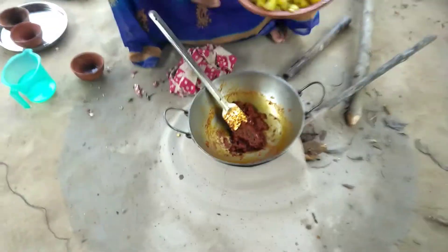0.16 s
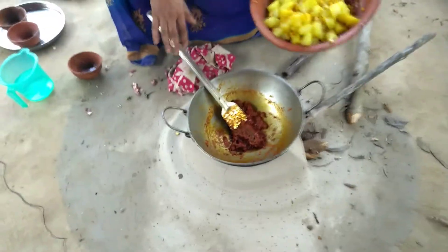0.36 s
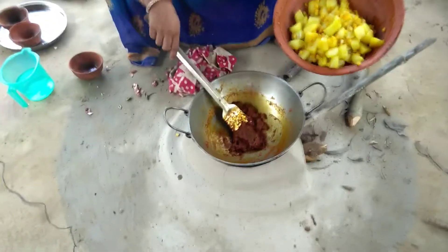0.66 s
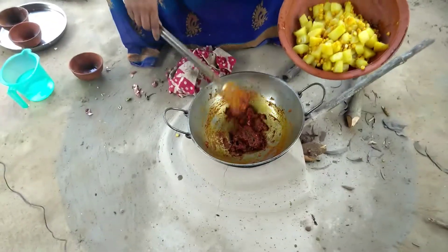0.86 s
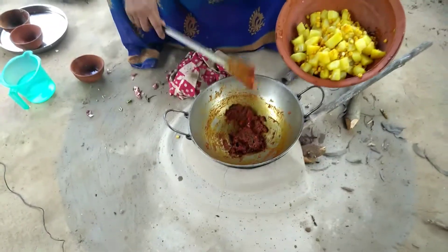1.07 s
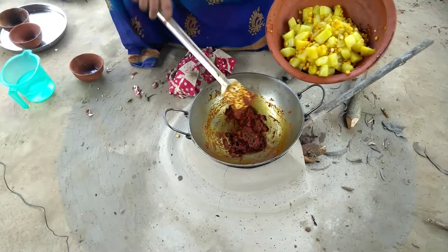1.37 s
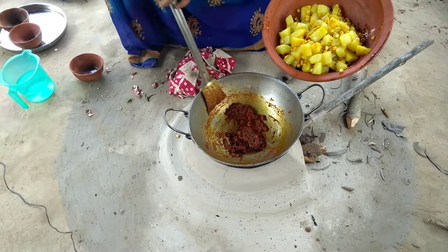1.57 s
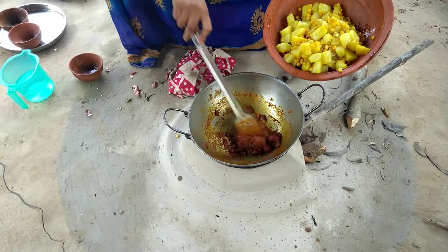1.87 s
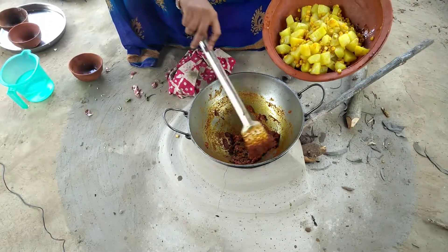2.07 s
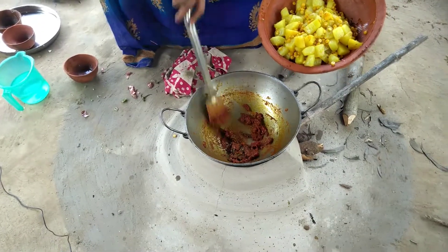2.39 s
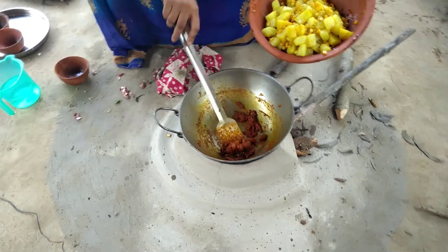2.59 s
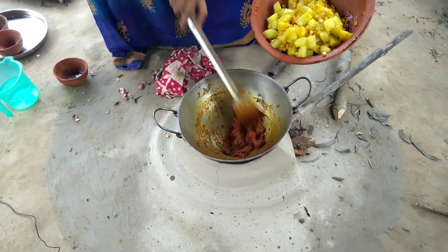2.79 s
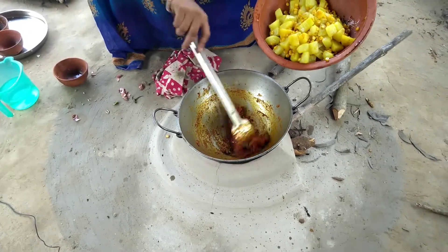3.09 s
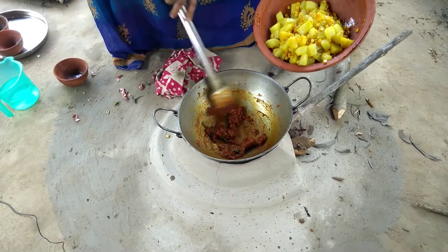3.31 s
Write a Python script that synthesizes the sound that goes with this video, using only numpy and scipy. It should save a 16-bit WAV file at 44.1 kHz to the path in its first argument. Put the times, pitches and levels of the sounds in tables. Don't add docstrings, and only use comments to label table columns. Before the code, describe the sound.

Spice paste sizzling in a metal pan, thin spitting flaring into dense frying after a spatula knock

```python
import sys
import numpy as np
from scipy import signal
from scipy.io import wavfile
from scipy.ndimage import uniform_filter1d

SR = 44100
rng = np.random.default_rng(int(sys.argv[2]) if len(sys.argv) > 2 else 0)


def volts(x):
    e = np.asarray(x, float) / 20
    return 10 ** e


def output_pcm(signal):
    pcm = np.clip(np.atleast_2d(signal).T, -1, 1) * 32767
    wavfile.write(sys.argv[1], SR, np.round(pcm).astype(np.int16))


N = 152145
T = np.arange(N) / SR
APART = np.array([[1], [-1]])


def unit(x):
    return x / np.sqrt(np.mean(x ** 2) + 1e-30)


def band(x, hz, octaves):
    half = 2 ** (octaves / 2)
    edges = np.clip([hz / half, hz * half], 10, SR / 2.05)
    return signal.sosfilt(signal.butter(2, edges, "band", fs=SR, output="sos"), x)


def walk(rate):
    hold = int(SR / rate)
    steps = np.repeat(rng.standard_normal(N // hold + 1), hold)
    smooth = uniform_filter1d(uniform_filter1d(steps, hold), hold)
    return unit(smooth[:N])


def clicks(rate, spread_db, shape):
    chance, sign, size = rng.random((3,) + shape)
    return (chance < rate / SR) * np.sign(sign - .5) * volts(-spread_db * np.log(size + 1e-4))


def ring(x, modes):
    out = 0
    for hz, db, t60 in modes:
        decay = np.exp(-np.log(1000) / (min(t60, 1.5) * SR))
        turn = 2 * np.pi * hz / SR
        poles = [1, -2 * decay * np.cos(turn), decay * decay]
        out = out + volts(db) * signal.lfilter([0, np.sin(turn)], poles, x)
    return out


def left_right(db):
    return np.array([volts(db / 2), volts(-db / 2)])


def bands(tone, make, lo_hz, flicker_db, rate, pan_db=0):
    tone, out, shared = np.array(tone), 0, walk(rate / 2)
    for hz in lo_hz * 2 ** np.arange(0, np.log2(17000 / lo_hz), 1 / 3):
        x = make()
        side = 1 / np.sqrt(1 + (4170 / hz) ** 2)
        stereo = np.array([x[0] + side * x[1], x[0] - side * x[1]])
        layer = unit(band(stereo, hz, 1 / 3))
        db = np.interp(np.log(hz), np.log(tone[:, 0]), tone[:, 1]) + 10 * np.log10(hz)
        flicker = flicker_db * (walk(rate) + .5 * shared)
        out = out + volts(db + flicker) * layer * left_right(pan_db * side ** 4).reshape(2, -1)
    return unit(out)


def sizzle(level_db, pan_db, tone, grain, lo_hz, start_s, stop_s):
    rate, spread_db, hiss_db, pop_rate, pop_db = grain
    broad = volts(pop_db) * unit(clicks(pop_rate, spread_db, (2, N)))

    def make():
        bursts = unit(clicks(rate, spread_db, (2, N)))
        return bursts + volts(hiss_db) * rng.standard_normal((2, N)) + broad

    fade_in = np.clip((T - start_s) / 0.011, 0, 1)
    fade_out = np.clip((stop_s - T) / 0.1, 0, 1)
    return bands(tone, make, lo_hz, 0.7, 34.98, pan_db) * fade_in * fade_out * volts(level_db)


def friction(rows, modes, t60, rate, ring_db, octaves):
    slip = unit(clicks(rate, 2.0, (2, N))) + .5 * rng.standard_normal((2, N))
    slip = slip * volts(2.0 * walk(39.95))
    ringing = unit(ring(slip, [(hz, db, t60) for hz, db in modes]))
    body = unit(slip) + volts(ring_db) * ringing
    out = 0
    for start, rise, fall, db, hz in rows:
        t = T - start
        swell = np.clip(t / max(rise, .001), 0, 1) ** 0.71
        fade = volts(-20 * np.clip((t - rise) / fall, 0, 9) ** 1.59)
        color = unit(band(band(body, hz, octaves), hz, 2 * octaves))
        out = out + volts(db) * swell * fade * color
    return out


def strikes(rows, modes, crack_db, spread_db, rattle_s, pan_db=0):
    out, n = np.zeros((2, N)), SR
    t = np.arange(n) / SR
    for start, db in rows:
        push = rng.standard_normal((2, n)) * np.exp(-np.minimum(t / rattle_s, 20))
        push[1] = 0.23 * push[0] + 2.3 * push[1]
        push = push / np.sqrt(np.sum(push ** 2, axis=1, keepdims=True))
        tilt = spread_db * rng.standard_normal(len(modes))
        x = ring(push, [(hz, d + shift, t60) for (hz, d, t60), shift in zip(modes, tilt)])
        crack = volts(crack_db) * band(push, 7400, 2.3) / np.abs(push).max()
        blow = volts(db) * left_right(pan_db)[:, None] * (x / np.abs(x).max() + crack)
        i = int(start * SR)
        out[:, i:i + n] += blow[:, :N - i]
    return out


def yard_air():
    # pitch_hz, level_db (per Hz)
    air_tone = [(30, -20), (70, -7), (250, -16), (750, -8), (1800, -16), (16000, -34)]
    return volts(-71) * bands(air_tone, lambda: rng.standard_normal((2, N)), 27.05, 0.94, 6.4)


def blade_rasps():
    # start_s, rise_s, fall_s, level_db, center_hz
    rasp_rows = [(0, 0.0045, 0.053, -45, 3470), (.092, 0.0013, 0.11, -53.5, 2160),
                 (.23, 0.0031, 1.2, -56.5, 1990), (.48, 0.16, 0.14, -50, 2060),
                 (.59, 0.014, 0.063, -35.5, 7350), (.685, 0.0035, 0.035, -57, 2600),
                 (.92, 0.01, 0.14, -44.5, 2600), (1.62, 0.0023, 0.3, -37.5, 5870),
                 (1.64, 0.018, 0.15, -43.5, 1450), (2.06, 0.0055, 3.4, -56, 1360),
                 (2.36, 0.047, 0.075, -48, 3850), (2.935, 0.017, 0.063, -23, 6260),
                 (1.53, 0.0029, 0.091, -48.5, 3170), (1.69, 0.042, 0.097, -43.5, 3220),
                 (2.935, .02, 0.066, -41, 1770), (2.94, 0.021, 0.087, -39, 3470),
                 (1.533, .003, 0.052, -33.5, 8500), (1.533, 0.0033, 0.094, -44, 12500),
                 (.6, 0.011, 0.066, -37, 5400), (1.1, 0.051, 1.2, -67, 1070), (3.26, .02, 0.053, -43, 6500),
                 (2.7, 0.22, 1.2, -65, 1300)]
    # pitch_hz, level_db
    pan_high = [(2400, 1.5), (2900, 10), (3500, 3.5), (6200, 11.5), (7400, -1.5)]
    rasp = friction(rasp_rows, pan_high, t60=0.14, rate=5000, ring_db=-13, octaves=0.98)
    return rasp[0] + 0.43 * rasp[1] * APART


def low_bumps():
    # start_s, level_db, pitch_hz, t60_s
    bump_rows = [(0, -38.5, 90.7, 0.42), (0.139, -40.5, 88, 0.17), (0.177, -35, 173, 0.085),
                 (0.235, -39.5, 126.5, 0.24), (0.322, -35, 90.3, 0.14), (.52, -31, 194, 0.096),
                 (0.687, -35.5, 179, 0.064), (1.0, -47.5, 175, 0.2), (1.502, -53, 78.4, 0.46),
                 (0.597, -35, 307, 0.077), (1.07, -55.5, 109, 0.27), (1.779, -56.5, 136, 0.26),
                 (2.326, -45, 313, 0.29), (2.669, -27, 419, 0.048), (3.03, -49, 302, 0.093),
                 (3.252, -54, 137, 0.46), (3.29, -45, 143, 0.31)]
    out, rough = 0, rng.standard_normal((2, N))
    for (start, db, hz, t60), lag in zip(bump_rows, rng.standard_normal(len(bump_rows))):
        t = np.clip(T - start, 0, None)
        turn = 2 * np.pi * hz * t * (1 - .5 * t) + lag * (70 / hz) ** 2 * APART
        thud = np.sin(turn) + 0.46 * unit(band(rough, hz, 2.06))
        out = out + volts(db - 60 * t / t60) * (1 - np.exp(-t / 0.0018)) * thud
    return out * left_right(0.17)[:, None]


def thin_spitting():
    # time_s, level_db, left_minus_right_db
    spit_curve = [(0, -59, 1), (.3, -56, -15), (.56, -53, -11), (.72, -39, -2), (.87, -59, -20),
                  (1.0, -50.5, -28), (1.09, -62.5, -47), (1.25, -41.5, -22), (1.39, -34, 5),
                  (1.52, -44.5, -1), (1.545, -42, 0), (1.6, -52, -2)]
    # pitch_hz, level_db (per Hz)
    spit_tone = [(1760, -54), (3000, -19), (3770, -21), (8450, -2), (14400, -6.5), (15800, -12)]
    spit_grain = (911, 3.5, -2.5, 87, -3)
    time_s, level_db, pan_db = np.array(spit_curve).T
    return sizzle(np.interp(T, time_s, level_db), np.interp(T, time_s, pan_db),
                  spit_tone, spit_grain, 3360, -1, 1.66)


def bangle_jingles():
    # start_s, peak_db
    jingle_rows = [(0.1165, -36), (0.1794, -39.5), (0.303, -36.5), (0.3581, -39), (0.5119, -33.5),
                   (0.99, -39)]
    # pitch_hz, level_db, t60_s
    bangle_modes = [(7950, -4.5, 0.11), (8200, 8, 0.073), (10500, 10, 0.052), (13200, 2, .03)]
    return volts(-7.0) * strikes(jingle_rows, bangle_modes, 0.7, 4, 0.025, -10.5)


def bubble_ticks():
    # start_s, peak_db, pitch_hz
    tick_rows = [(.232, -55, 1570), (.689, -52, 2600), (1.322, -50, 3590), (1.454, -37, 3710),
                 (1.457, -44.5, 970), (1.717, -25.5, 3504), (1.759, -29.5, 2510), (1.773, -27.5, 3530),
                 (1.808, -24, 3807), (1.879, -40, 3960), (2.953, -29, 3210)]
    return sum(strikes([(s, db)], [(hz, 0, 0.027)], -12, 0, 0.006) for s, db, hz in tick_rows)


def spatula_drags():
    # start_s, rise_s, fall_s, level_db, center_hz
    drag_rows = [(.35, 0.033, 0.36, -48.5, 600), (.76, 0.12, .2, -67.5, 740), (1.0, 0.096, 0.14, -55, 336),
                 (2.47, 0.039, 0.53, -62.5, 820), (2.7, .05, .6, -55, 674), (.485, 0.0043, 0.23, -46, 253),
                 (.92, 0.047, 0.42, -53, 700), (1.53, 0.0028, 0.26, -43.5, 390),
                 (1.62, 0.1, 0.021, -40.5, 590), (1.72, 0.033, 0.046, -48.5, 480),
                 (2.06, 0.035, 0.45, -58, 597), (2.31, 0.021, 0.077, -53, 354),
                 (2.365, 0.041, 0.073, -39.5, 554), (2.664, 0.0063, 0.05, -39.5, 480),
                 (2.97, 0.029, 0.059, -41, 470), (3.02, 0.046, 0.4, -48.5, 454),
                 (3.22, 0.077, 0.75, -54, 560), (3.36, 0.01, 0.12, -43.5, 476)]
    # pitch_hz, level_db
    pan_low = [(320, 3.5), (415, -49), (477, -4), (600, -3.5), (730, 0.5), (880, 1), (1350, 9)]
    drag = friction(drag_rows, pan_low, t60=0.049, rate=500, ring_db=-4.5, octaves=1.043)
    return drag[0] + 0.048 * drag[1] * APART


def handle_clinks():
    # start_s, peak_db
    handle_rows = [
        (.597, -30.5),
        (.64, -35),
    ]
    # pitch_hz, level_db, t60_s
    handle_modes = [(2035, -19, .8), (3252, -9, .8), (6255, -10, .06), (7612, -7, .1), (9528, -9, .05)]
    return strikes(handle_rows, handle_modes, 1.6, 1, 0.011)


def bowl_rocking():
    # start_s, rise_s, fall_s, level_db, center_hz
    rock_rows = [
        (1.25, 0.15, 0.11, -56.5, 694),
        (1.185, 0.057, 0.95, -68.5, 1670),
        (0.681, 0.12, 0.13, -69, 1980),
    ]
    return friction(rock_rows, [(730, 10), (1755, -10), (2035, -5)], 0.31, 500, 12, 0.27)[0]


def oil_pops():
    # start_s, peak_db
    pop_rows = [(0.7202, -26), (1.2526, -25.5), (1.324, -20.5), (1.3844, -22), (1.2163, -40), (1.3016, -28),
                (1.363, -32), (1.4577, -35)]
    return band(strikes(pop_rows, [(10240, 0.98, 0.0048)], 0, 1, 0.00043, -2.8), 8500, 4.4)


def bowl_knocks():
    # start_s, peak_db
    bowl_rows = [
        (.925, -50),
        (1.086, -38),
        (1.16, -48),
    ]
    # pitch_hz, level_db, t60_s
    bowl_modes = [(730, 0, .7), (1350, -18, .3), (1755, -26, .5)]
    return strikes(bowl_rows, bowl_modes, -37, 1.5, 0.006)


def blade_knock():
    # start_s, peak_db
    blade_rows = [
        (1.5303, -9),
        (1.5345, -18),
    ]
    # pitch_hz, level_db, t60_s
    blade_modes = [(337, -14, 0.11), (2600, -5.5, 0.0071), (6214, -5, 0.11), (8540, -9, 0.068),
                   (9020, 0, 0.026), (10450, 3, 0.0086), (12360, 2, 0.021)]
    contact = strikes([(1.5305, -8)], [(9200, 0, 0.0033)], 0, 0, 0.00035)
    return strikes(blade_rows, blade_modes, 1.9, 2.3, 0.0029) + contact


def full_frying():
    # time_s, level_db
    fry_curve = [(1.62, -31.5), (1.69, -31), (1.8, -34.5), (2.05, -32), (2.14, -30), (2.24, -28),
                 (2.4, -26), (2.65, -28.5), (2.76, -26), (2.9, -24.5), (3.1, -27), (3.3, -23.5),
                 (3.37, -26.5)]
    # pitch_hz, level_db (per Hz)
    fry_tone = [(410, -74), (700, -42), (2790, -14), (4230, -14), (5860, -10), (9750, -3.5), (15800, -11)]
    fry_grain = (2548, 2, 4.5, 222, -7.5)
    level_db = np.interp(T, *np.array(fry_curve).T)
    return sizzle(level_db, -7.5, fry_tone, fry_grain, 822.5, 1.615, 9)


def yard_echo(near):
    t = T[:SR // 4]
    tail = rng.standard_normal((2, len(t))) * volts(-60 * t / 0.37) * (t > .004)
    tail = tail / np.sqrt(np.sum(tail ** 2) / 2)
    return volts(-7.5) * signal.fftconvolve(near, tail, axes=1)[:, :N]


def scene():
    waver = volts(3.5 * walk(30))
    near = blade_rasps() + low_bumps() + bangle_jingles() + spatula_drags()
    near = near + handle_clinks() * waver + bowl_rocking() + oil_pops() + bowl_knocks() * waver
    blade = blade_knock()
    near = near + volts(-9.5) * blade
    direct = near + bubble_ticks() + 0.54 * blade
    return direct + yard_echo(near) + yard_air() + thin_spitting() + full_frying()


def band_limit(x):
    return signal.sosfilt(signal.butter(12, 17030, fs=SR, output="sos"), x)


def record(dry):
    x = signal.sosfilt(signal.ellip(8, .3, 60, 16000, fs=SR, output="sos"), dry)
    f, _, z = signal.stft(x, SR, nperseg=2048)
    power = uniform_filter1d(np.sum(np.abs(z) ** 2, axis=0), size=2, axis=1)
    local = uniform_filter1d(power, size=6, axis=0)
    wide = np.exp(uniform_filter1d(np.log(np.abs(local) + 1e-30), size=40, axis=0))
    starved = np.clip((-80 - 10 * np.log10(wide + 1e-30)) / 12, 0, 1.0)
    mask_db = -1.0 + starved - 1.5 * np.log2((f[:, None] + 1) / 4800) ** 2
    limit = wide * volts(2 * np.maximum(mask_db, -5.5)) * (f[:, None] > 1400)
    kept = z / (1 + (limit / (local + 1e-30)) ** 14)
    x = signal.istft(kept, SR, nperseg=2048)[1][:, :N]
    return band_limit(x)


dry = scene()
out = record(dry)
output_pcm(out)
```